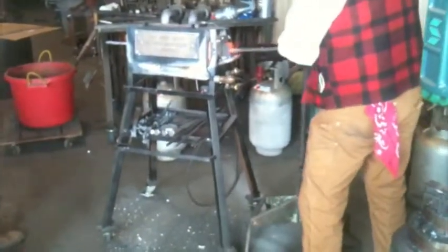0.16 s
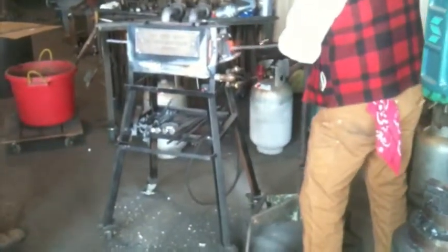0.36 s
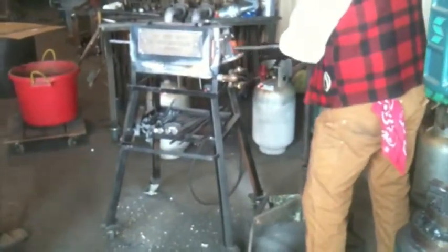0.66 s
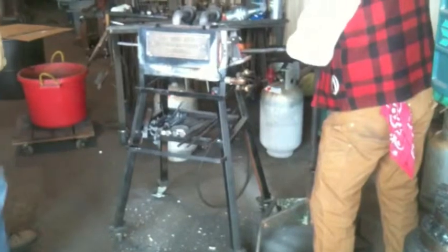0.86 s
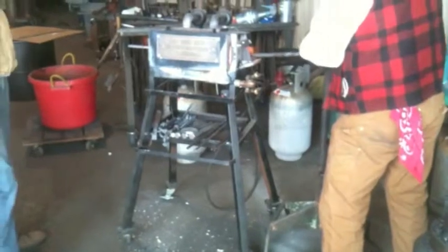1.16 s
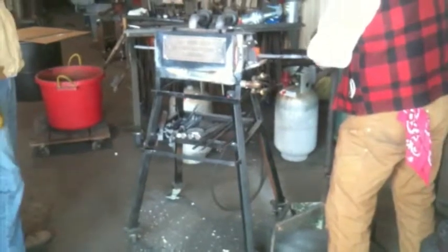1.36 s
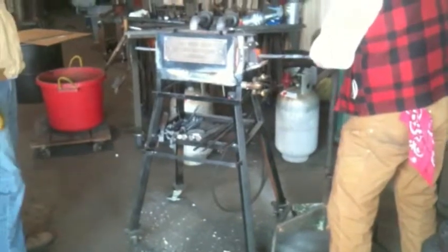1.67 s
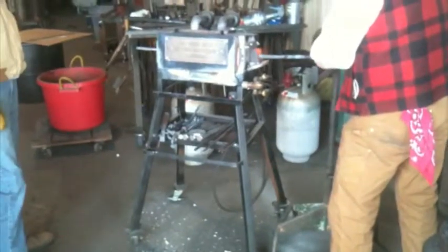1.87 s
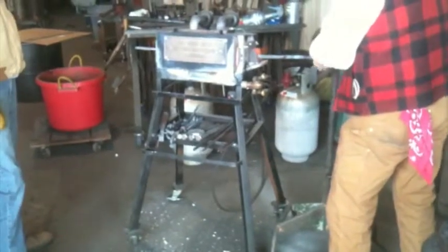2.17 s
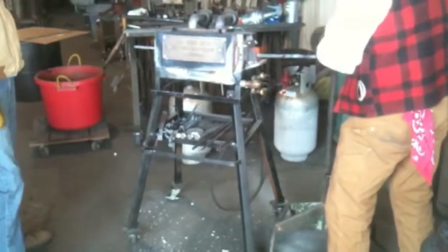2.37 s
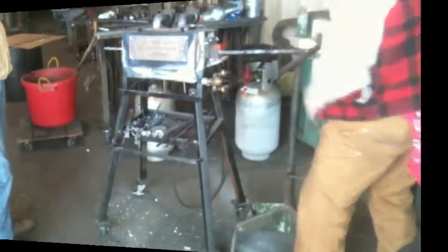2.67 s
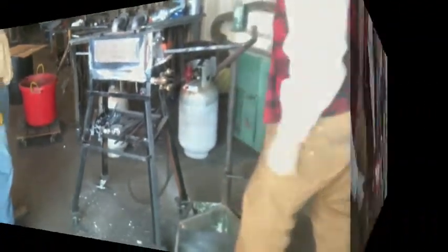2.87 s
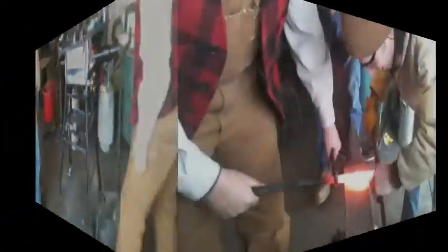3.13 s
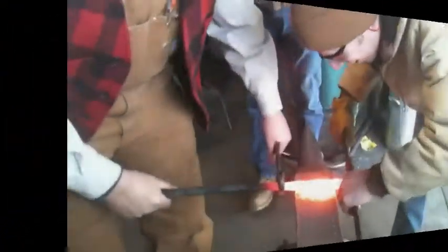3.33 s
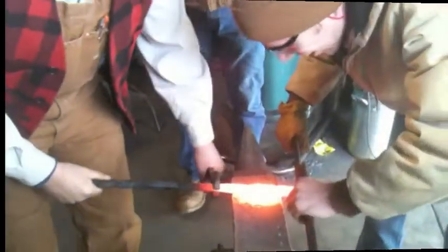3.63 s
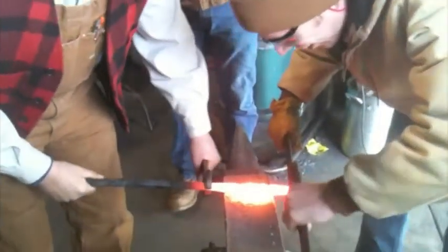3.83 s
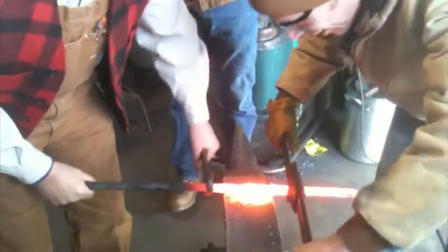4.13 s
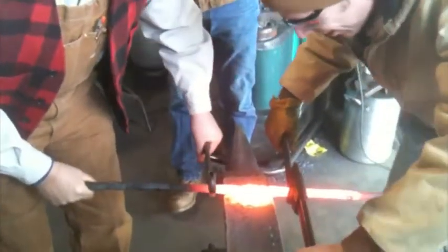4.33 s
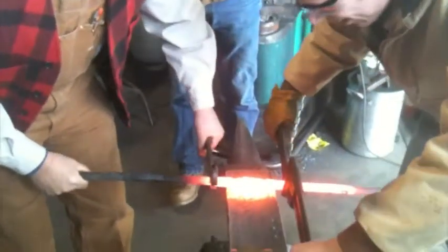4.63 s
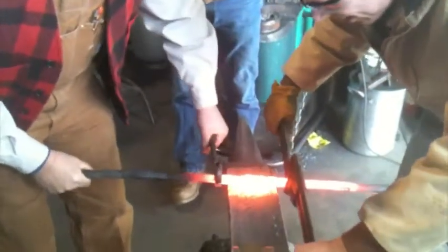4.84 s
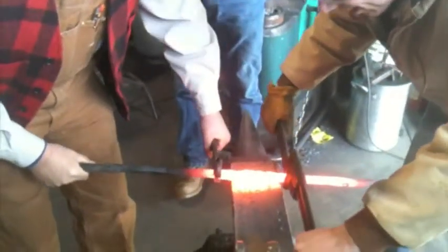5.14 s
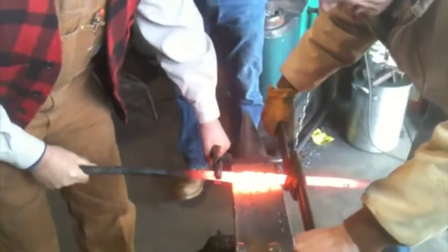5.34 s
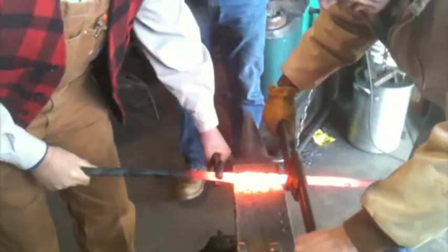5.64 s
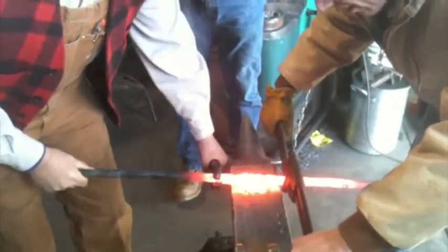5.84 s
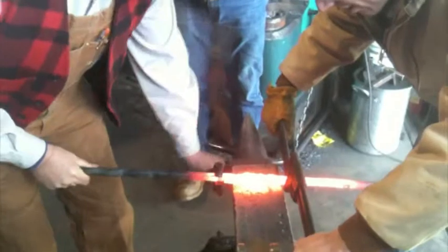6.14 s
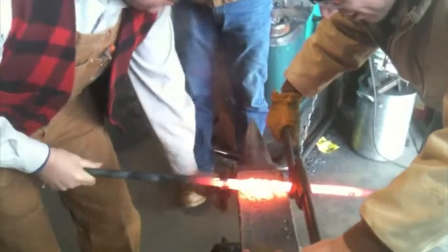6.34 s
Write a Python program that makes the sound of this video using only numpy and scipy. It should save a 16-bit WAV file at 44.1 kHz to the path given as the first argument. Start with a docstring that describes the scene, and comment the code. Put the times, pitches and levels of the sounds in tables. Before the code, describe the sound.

An air hammer puffs and knocks over a roaring gas forge, then both fade, leaving steel tools scraping and ticking on an anvil.

```python
"""A machine, likely an idling air hammer, puffs and knocks four times a second in a smithy, over the
roar of a gas forge. Each piston stroke blows out air, then jolts the frame. Both fade away, leaving
steel tools that scrape and tick on a hot bar at the anvil, and a low shop hum behind them.
One microphone takes it all in mono, near enough that the direct sound stands above the room."""
import sys
import numpy as np
from scipy import signal
from scipy.fft import rfft, irfft
from scipy.io import wavfile

SR = 44100
rng = np.random.default_rng(int(sys.argv[2]) if len(sys.argv) > 2 else 0)


def wrap_up_sound(samples):
    """Save the sound to the file named by the first command line argument, as 16-bit audio."""
    columns = np.atleast_2d(samples).T
    # keep every value between -1 and 1, then stretch to whole-number steps
    tamed = np.clip(columns, -1, 1)
    steps = np.round(tamed * 32767).astype(np.int16)
    wavfile.write(sys.argv[1], SR, steps)


N = 286650
T = np.arange(N) / SR
HZ = np.fft.rfftfreq(N, 1 / SR)
FIRST_PUFF_S, STROKE_S = .0435, .25097
FADE_START_S, FADE_END_S = 2.37, 3.958

# Spectra of the hammer's air at the microphone: frequency_hz, relative_db
EXHAUST_SPECTRUM = [(60, -48), (300, -22), (700, -10.5), (1100, -14.5), (1600, -9.5), (2200, -3.5),
                    (2700, -7.5), (4500, -7), (6000, -1), (7700, 1), (10300, -1), (12000, 2.5),
                    (13500, 0.5), (15700, -5.5)]
LEAK_SPECTRUM = [(60, -50), (400, -8.5), (1000, -8.5), (1600, -4.5), (2700, -7), (4600, -5.5), (5900, 0),
                 (7400, 0), (9000, -2.5), (11000, -4), (13500, -1.5), (15700, -11)]
INTAKE_SPECTRUM = [(60, -59.5), (3000, -24), (4800, -14), (5900, 0), (7500, -0.5), (9000, -9.5),
                   (11000, -13), (15700, -32.5)]
# Resonances of its air pipes: pitch_hz, width_hz, level_db
PIPE_RESONANCES = [(1290, 30, -52.5), (1503, 35, -46.5), (1626, 120, -45.5), (1983, 45, -45),
                   (2183, 40, -51.5), (2298, 40, -43.5), (3183, 99, -44.5), (3480, 200, -42.5),
                   (3730, 45, -47.5)]


def hammer_air():
    """Each piston stroke blows a bright puff; air leaks on, then the return draws a narrower hiss."""
    opening = bell(stroke_time(0), .027)
    exhaust = amp(-11) * noise(EXHAUST_SPECTRUM) * opening * amp(.51 * drift(25))
    push = amp(-61.5) * resonance(45, 45) * opening ** 2  # the puff also shoves the air
    flow = 1 - .7 * bell(stroke_time(-.072), .019)  # stalls as the piston turns
    leak = amp(-25.5) * noise(LEAK_SPECTRUM) * flow * amp(.67 * drift(15.3))
    pipes = sum(amp(db) * resonance(hz, width) for hz, width, db in PIPE_RESONANCES)
    pipes *= .79 * flow + opening
    intake = amp(-27) * noise(INTAKE_SPECTRUM) * bell(stroke_time(.15), .028)
    return exhaust + push + leak + pipes + intake


# Modes of the hammer's frame: pitch_hz, relative_db, t60_s
FRAME_MODES = [(218.4, -20.5, 0.077), (275, -27.5, 0.04), (343, -27, 0.026), (457, -30, 0.044),
               (596, -31.5, 0.052)]


def hammer_knocks(delay_s=.0405, jitter_s=.00084, spread_db=1.0):
    """Just after each puff the piston reverses and knocks the frame."""
    out, ring = np.zeros(N), strike(FRAME_MODES, attack_s=.004)
    for s in np.arange(FIRST_PUFF_S + delay_s, FADE_END_S, STROKE_S):
        lateness, force = rng.standard_normal(2)
        add(out, s + jitter_s * lateness, amp(3.5 + spread_db * force) * ring)
    return out


# Spectrum of the gas flame: frequency_hz, relative_db
FLAME_SPECTRUM = [(30, -51), (72, -44.5), (110, -20.5), (170, -8), (300, -3.5), (400, -8), (700, -13),
                  (1100, -15.5), (1600, -12), (2800, -15.5), (6500, -13), (13000, -22.5), (15700, -28)]
# Resonances of the firebox around it: pitch_hz, width_hz, level_db
FIREBOX_RESONANCES = [(119.2, 8.3, -51), (159, 28, -49), (229.8, 36, -35), (314.5, 43, -37.5),
                      (462, 15, -49.5), (516, 26, -44.5), (737.3, 24, -47.5)]


def forge():
    """The flame's broad roar and the firebox resonances that it drives."""
    roar = amp(-28.5) * noise(FLAME_SPECTRUM) * amp(.87 * drift(8.6))
    return roar + sum(amp(db) * resonance(hz, width) for hz, width, db in FIREBOX_RESONANCES)


# Spectrum of steel sliding on the hot bar: frequency_hz, relative_db
SCRAPE_SPECTRUM = [(180, -41), (300, -13), (360, -16.5), (478, -10.5), (828, -14), (1150, -11), (1250, -15),
                   (1840, -3), (2030, -10), (4230, -8.5), (4910, -11.5), (7200, -5), (10200, -10.5),
                   (12300, -10), (16000, -25)]
# Tool strokes at the anvil: peak_s, length_s, level_db, tilt_db_per_octave
TOOL_STROKES = [(3.884, 0.071, -44.5, -0.7), (4.01, 0.19, -52, 2), (4.157, 0.076, -40.5, -0.5),
                (4.332, .07, -46, -1.2), (4.392, 0.1, -45, 1.5), (4.565, 0.13, -60, -2),
                (4.74, 0.14, -61.5, -3), (4.85, 0.18, -54.5, 1.2), (5.44, .22, -70.5, -5),
                (5.715, .06, -63, 0.3), (6.43, .16, -64, -2.5)]


def scrapes(press_share=.33, grain_db=2.0):
    """Steel slides over the scaly bar: each stroke presses in fast and eases off, catching unevenly."""
    out = np.zeros(N)
    t = np.arange(SR) / SR - .5  # one second centred on full pressure
    bar = resonance(hz=1790, width_hz=240)
    for peak_s, length_s, db, tilt_db in TOOL_STROKES:
        pressure = bell(t, length_s * np.where(t < 0, press_share, 1 - press_share))
        slide = noise(SCRAPE_SPECTRUM, tilt_db, size=SR)
        # the bar sings along, more under dull strokes
        ring = amp(-14 - 1.3 * tilt_db) * np.roll(bar, rng.integers(N))[:SR]
        # at full pressure the edge digs in: a brief, darker rasp
        bite = amp(-6) * bell(t, .012) * noise(SCRAPE_SPECTRUM, tilt_db=-4, size=SR)
        add(out, peak_s - .5, amp(db) * (pressure * (slide + ring) + bite))
    return out * amp(grain_db * drift(280))


# Spectrum of a steel contact or a crack of scale: frequency_hz, relative_db
TICK_SPECTRUM = [(40, -60), (200, -28), (700, -25), (1200, -26), (1700, -2), (2300, 1), (3000, -1),
                 (3900, -2), (5500, -2), (9000, -7), (15000, -21)]
# Contacts and cracks at the anvil: start_s, level_db, tilt_db_per_octave
ANVIL_TICKS = [(4.2805, -34.5, 2), (4.286, -35, 6), (4.3925, -36, -1), (4.405, -38, -4), (4.684, -40, -4.5),
               (4.7071, -37.5, -3), (4.724, -45, -5), (4.7425, -39, -7), (4.757, -42.5, 0),
               (4.7685, -39.5, -7), (5.0153, -52, 3), (5.435, -56.5, 10), (5.693, -50, 5.5),
               (6.2685, -48.5, -6), (6.279, -53.5, -4), (6.3257, -55, -1)]


def ticks(base_t60_s=.027, doubling_tilt_db=6.5):
    """Short dry contacts, damped by the anvil; the duller, the shorter."""
    out, t = np.zeros(N), np.arange(SR // 10) / SR
    for start_s, db, tilt_db in ANVIL_TICKS:
        t60_s = base_t60_s * 2 ** (tilt_db / doubling_tilt_db)
        add(out, start_s, amp(db - 60 * t / t60_s) * noise(TICK_SPECTRUM, tilt_db, size=len(t)))
    return out


def scale_crunch(peak_s=4.735, width_s=.033, peak_cracks_per_s=500, t60_s=.0067):
    """Flakes of scale crunch under the tongs in a short flurry of tiny cracks."""
    strength = amp(5.3 * np.minimum(rng.exponential(1, N), 3))
    breaks = rng.random(N) < peak_cracks_per_s / SR * bell(T - peak_s, width_s)
    t = np.arange(SR // 50) / SR
    crack = amp(-59 - 60 * t / t60_s) * noise(TICK_SPECTRUM, size=len(t))
    return signal.fftconvolve(strength * breaks, crack)[:N]


# Brief resonances, one low and the rest squeaky: peak_s, half_length_s, pitch_hz, width_hz, level_db
BRIEF_RESONANCES = [(3.925, .042, 1110, 150, -54), (3.93, .06, 290, 130, -49),
                    (4.397, .013, 2800, 1500, -40), (4.553, .015, 4300, 220, -59)]


def brief_resonances():
    """A low dull ring as the forge fades, and squeaks of rubbed metal, each a single resonance."""
    return sum(amp(db) * bell(T - peak_s, half_s) * resonance(hz, width_hz)
               for peak_s, half_s, hz, width_hz, db in BRIEF_RESONANCES)


# Modes of a steel bar, heard through the hammer's hiss: pitch_hz, level_db, t60_s
BAR_MODES = [(1970, -24, .2), (3980, -26, 0.14), (5235, -21, 0.17), (5380, -22.5, 0.28), (6300, -34.5, .12)]


def clink(start_s=1.449, shiver_db=3):
    """A steel bar brushes another and rings briefly."""
    out = np.zeros(N)
    add(out, start_s, strike(BAR_MODES, attack_s=.0045))
    return out * amp(shiver_db * drift(120))


# Modes of a steel tool: pitch_hz, level_db, t60_s
TOOL_MODES = [(199, -33.5, 0.047), (1460, -43, .04), (1970, -36, .04), (2450, -41, .03), (4100, -35, 0.027),
              (5900, -34, .03)]


def clunk(start_s=4.279):
    """A steel tool is set down hard with a short, damped ring."""
    out = np.zeros(N)
    add(out, start_s, strike(TOOL_MODES, attack_s=.002))
    return out


# Motor hum in the background: pitch_hz, level_db
MOTOR_TONES = [(74, -81.5), (106.5, -70.5), (136, -73.5), (151, -65.5), (189, -73), (227, -74.5)]
# Room tone of the shop: frequency_hz, relative_db
RUMBLE_SPECTRUM = [(18, -82), (30, -47.5), (53, -24), (145, -5.5), (215, -8), (303, -11.5), (540, -24.5),
                   (584, -19.5), (1390, -26), (1760, -27), (3060, -34), (3870, -30.5), (7470, -30.5),
                   (14000, -38), (16000, -49)]


def shop_hum(waver_hz=2.0):
    """Low rumble and a wavering motor hum, a little louder toward the end."""
    hum = np.zeros(N)
    for hz, db in MOTOR_TONES:
        level = amp(db + 2 * drift(4))
        phase = 2 * np.pi * np.cumsum(hz + waver_hz * drift(6)) / SR
        hum += level * unit(np.sin(phase))
    swell_db = np.interp(T, [4.95, 5.1], [-2.5, 0])
    return (hum + amp(-58.5) * noise(RUMBLE_SPECTRUM)) * amp(swell_db)


def near_echoes(x, count=10, gain=.06):
    """Echoes off the floor and nearby steel reach the microphone just late enough to comb the hiss."""
    out = x.copy()
    for delay_s, sign in zip(rng.uniform(.002, .022, count), rng.choice([-1, 1], count)):
        add(out, delay_s, gain * sign * x)
    return out


# Reverberation of the smithy: frequency_hz, t60_s
ROOM_DECAY = [(150, 0.62), (1000, .45), (5000, 0.56), (15000, 0.067)]


def room(x, echoes_per_s=2000):
    """Scattered reflections, each band dying at its own speed."""
    taps = rng.standard_normal(SR) * (rng.random(SR) < echoes_per_s / SR)
    taps[:SR // 300] = 0  # gap before the first reflection
    hz, t, bands = signal.stft(taps, SR, nperseg=256)
    decay = amp(-60 * t / curve(ROOM_DECAY, hz)[:, None])
    tail = signal.istft(bands * decay, SR, nperseg=256)[1]
    return signal.fftconvolve(x, tail / np.linalg.norm(tail))[:N]


def strike(modes, attack_s):
    """Modes set ringing by a blow that builds up over the attack time; steel radiates little bass."""
    t = np.arange(SR // 3) / SR
    ring = sum(amp(db - 60 * t / t60) * np.sin(2 * np.pi * hz * (t - attack_s)) for hz, db, t60 in modes)
    ring *= 1 - np.exp(-(t / attack_s) ** 2)
    return signal.sosfilt(signal.butter(4, 140, "high", fs=SR, output="sos"), ring)


def stroke_time(delay_s):
    """Seconds from the nearest moment that lies delay_s after the middle of a puff."""
    return (T - FIRST_PUFF_S - delay_s + STROKE_S / 2) % STROKE_S - STROKE_S / 2


def noise(spectrum, tilt_db=0, size=N):
    """Noise of rms 1 with the given spectrum, tilted by tilt_db an octave above 400 Hz."""
    hz = np.fft.rfftfreq(size, 1 / SR)
    colour = amp(curve(spectrum, hz) + tilt_db * np.log2(np.maximum(hz, 400) / SR))
    return unit(irfft(rfft(rng.standard_normal(size)) * colour, size))


def resonance(hz, width_hz):
    """Noise ringing one resonance, rms 1."""
    response = 1 / (1 + ((HZ - hz) / width_hz) ** 2) ** 2
    return unit(irfft(rfft(rng.standard_normal(N)) * response, N))


def drift(rate_hz):
    """Random wander, rms 1."""
    return unit(irfft(rfft(rng.standard_normal(N)) * np.exp(-(HZ / rate_hz) ** 2), N))


def curve(points, hz):
    """Joins points on a log-frequency axis."""
    point_hz, value = np.transpose(points)
    return np.interp(np.log(hz + 1), np.log(point_hz + 1), value)


def bell(t, width_s):
    """A smooth swell around t = 0."""
    return np.exp(-.5 * (t / width_s) ** 2)


def amp(db):
    """Decibels to gain."""
    return 10 ** (np.asarray(db) / 20)


def unit(x):
    """Scales to rms 1."""
    return x / np.sqrt(np.mean(x ** 2) + 1e-20)


def add(mix, start_s, sound):
    """Mixes a sound in at start_s."""
    part = mix[round(start_s * SR):][:len(sound)]
    part += sound[:len(part)]


def scene():
    """Hammer and forge fade out together; the anvil work stays. One microphone feeds both channels."""
    fade = np.clip((FADE_END_S - T) / (FADE_END_S - FADE_START_S), 0, 1)
    air, knocks = hammer_air(), hammer_knocks()
    clatter = scrapes() + ticks() + scale_crunch() + brief_resonances() + clink() + clunk()
    hammer = near_echoes(air) + amp(-10) * room(air) + knocks + amp(-6) * room(knocks)
    mono = fade * (hammer + forge()) + clatter + amp(-12) * room(clatter) + shop_hum()
    return np.array([mono, mono])


def record(dry):
    """The loudest puffs saturate the microphone softly; then the top treble is cut off."""
    ceiling, cutoff_hz = .85, 15780
    soft = dry / (1 + (dry / ceiling) ** 4) ** .25
    lowpass = signal.firwin(1023, cutoff_hz, window=("kaiser", 9), fs=SR)
    return signal.oaconvolve(soft, lowpass[None], "same")


dry = scene()
out = record(dry)
wrap_up_sound(out)
```